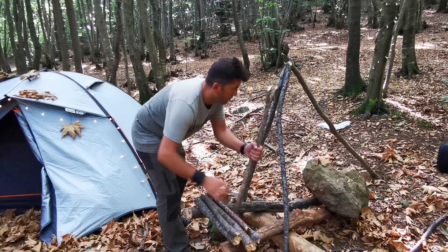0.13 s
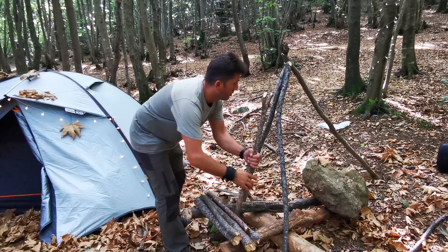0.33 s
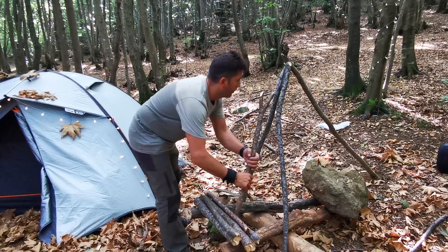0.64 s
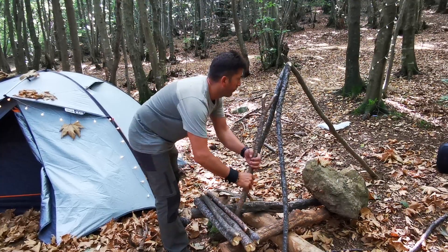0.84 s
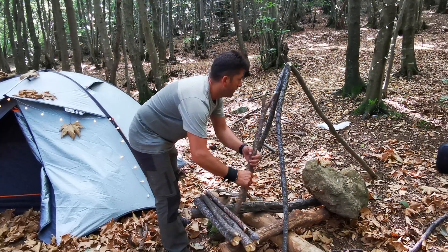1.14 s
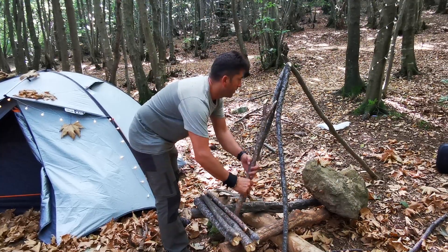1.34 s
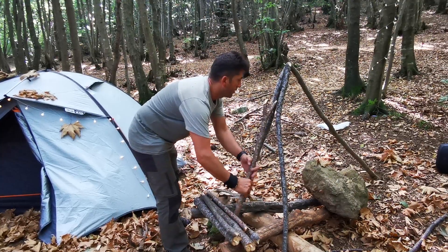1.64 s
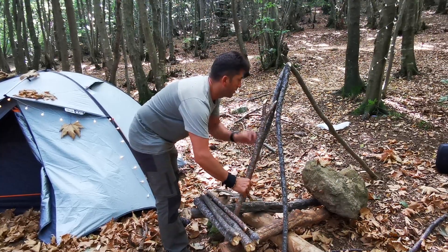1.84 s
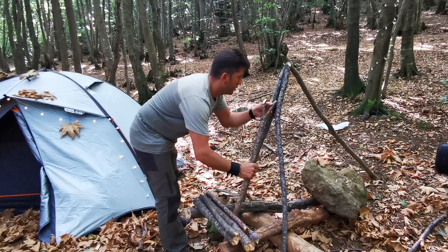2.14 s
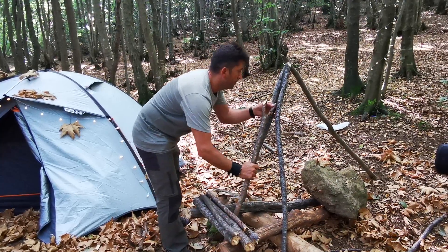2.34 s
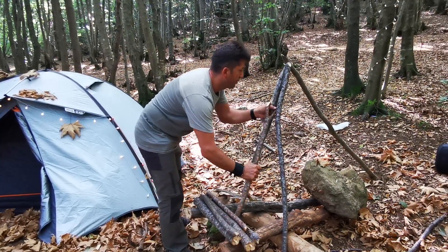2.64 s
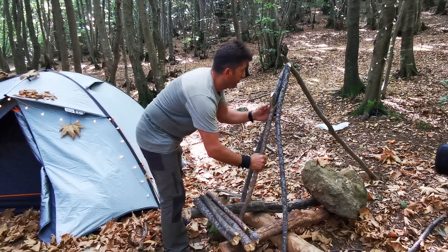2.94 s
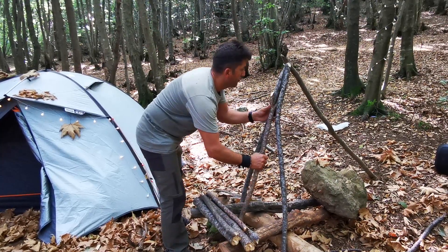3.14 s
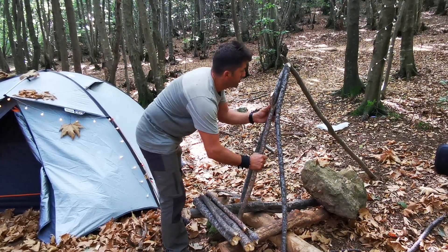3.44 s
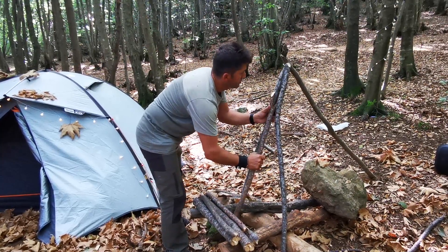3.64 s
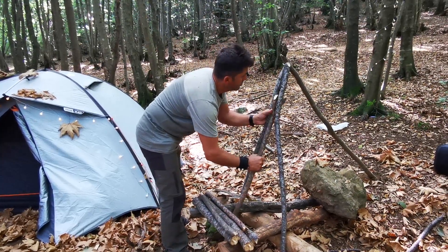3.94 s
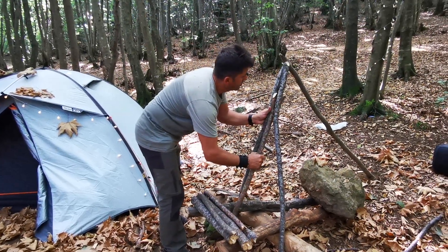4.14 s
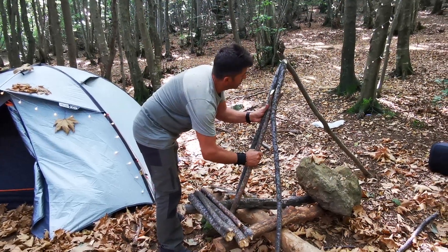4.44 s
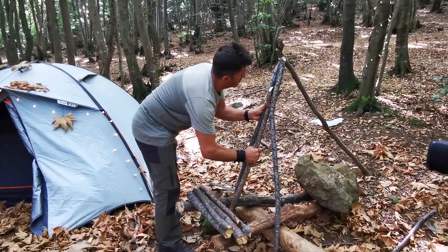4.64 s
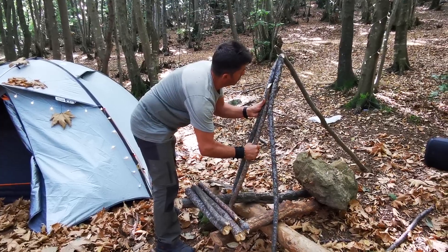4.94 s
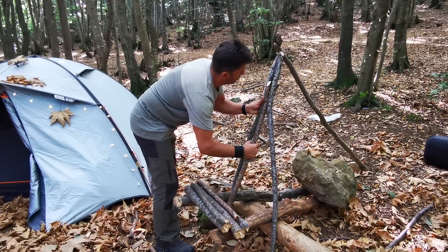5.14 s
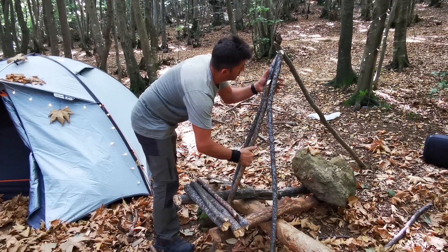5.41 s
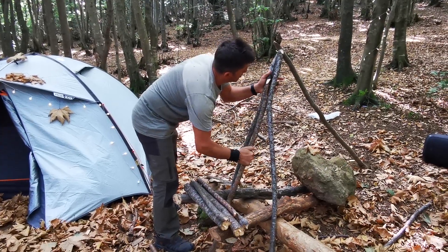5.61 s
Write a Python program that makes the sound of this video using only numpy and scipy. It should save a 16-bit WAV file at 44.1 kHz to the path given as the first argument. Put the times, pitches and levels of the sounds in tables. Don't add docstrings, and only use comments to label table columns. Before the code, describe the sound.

In a hushed woodland, sticks drop with hard woody knocks and crisp leaf snaps, followed by a scuff and sparse rubbing, crackling pole movements.

```python
import sys
import numpy as np
from scipy import signal
from scipy.fft import rfft, irfft
from scipy.io import wavfile

SR = 44100
rng = np.random.default_rng(int(sys.argv[2]) if len(sys.argv) > 2 else 0)


def dump_mix(stems):
    frames = np.atleast_2d(stems).T
    limited = np.clip(frames, -1, 1)
    pcm = np.round(limited * 32767).astype(np.int16)
    wavfile.write(sys.argv[1], SR, pcm)


def linear_from_db(decibels):
    return 10 ** (np.asarray(decibels, float) / 20)


N = 254456

# (frequency [Hz], density [dB per Hz])
AIR_SPECTRUM = [(12, -20.5), (20, -2), (113, -3), (172, -4), (251, -1), (380, -6.5), (690, -11),
                (1190, -21.5), (1500, -25), (1950, -88.5), (3300, -120)]
# (frequency [Hz], density [dB per Hz])
HISS_SPECTRUM = [(500, 3.5), (1200, -2), (2500, -2), (4000, -0.5), (7000, -2), (9000, -12.5),
                 (10500, -12.5), (15500, -15.5)]
AIR_DB, HISS_DB = -66.5, -64.5
# (time [s], level [dB], half-width [s])
GUSTS = [
    (.35, 6, 0.089),
    (1.3, 2.5, 0.5),
    (3.03, 5, 0.16),
    (3.2, 1.5, 0.075),
    (4.7, 2, 0.23),
    (5.65, 1.5, 0.12),
]
# (time [s], level [dB], half-width [s])
PUFFS = [
    (1.0, -2, .15),
    (3.37, 18, 0.084),
    (4.72, 7, 0.084),
]

# (time [s], peak
# level [dB], part below 8 kHz [dB])
LEAF_SNAPS = [(0.054, -43, 5), (0.0841, -23.5, -7), (0.0912, -15.5, -28), (.108, -25, -13.5),
              (0.1388, -11, -17), (0.161, -21.5, 2), (0.201, -20.5, -12), (0.23, -43, -15),
              (0.2371, -20.5, -24), (0.332, -46, -4), (0.463, -32, -3), (0.589, -33, 4), (0.673, -53, 5),
              (.733, -31.5, -19), (.7498, -40, -12), (.779, -38, -18), (.3621, -31, -12),
              (.3805, -31, -14), (.3935, -34, -12), (0.405, -32, -1), (.523, -32, -12), (0.545, -26, -12),
              (0.844, -45, -6), (0.88, -42, -10), (0.8895, -44, -10), (0.904, -38, -17), (0.927, -45, -15),
              (0.9406, -47, -8.5), (0.961, -44.5, -10),
              (1.4355, -39, -11), (1.5387, -38, 1), (2.4435, -36.5, -10), (2.4747, -44, -12),
              (2.4955, -25, -5.5), (2.4996, -22, -8), (2.651, -39, -19), (2.6746, -22, -30),
              (2.677, -32, -12), (2.6833, -20, -8), (2.6848, -15.5, -22), (2.6878, -24, -5),
              (2.6934, -15, -16), (2.7286, -30, -14), (3.031, -22, -18), (3.032, -21.5, -7.5),
              (3.7265, -25, -7), (3.731, -23, -12), (3.746, -27, -24), (3.7852, -33.5, 5), (3.8, -34, -12),
              (3.926, -29, -16), (3.9635, -23, -16), (3.974, -23.5, -23), (4.4965, -33, -19),
              (4.571, -45, -2), (4.8258, -36, -17), (4.9783, -34, -16), (4.985, -37, -18), (5.2121, -40, 0),
              (5.3815, -36, -11), (5.3894, -30, -24),
              (.021, -48, -3), (.0363, -48, -5), (0.102, -25, -11), (0.22, -30, 4), (0.5725, -31, -13),
               (0.626, -33, -4), (0.6357, -38, -12), (0.6884, -35, -10), (0.803, -41, -17.5),
               (.8522, -42, -7), (0.909, -48, -11), (.935, -49, -11), (1.285, -44, -10), (1.347, -48, -14),
               (1.4945, -45, -17), (1.5017, -46, -17), (1.679, -51, -13), (1.836, -46, -12),
               (1.9, -49, -12), (2.0596, -44, -12), (2.1679, -42, -12), (2.4341, -44, -4),
               (2.4596, -43, -8), (2.463, -41, -5), (2.4678, -45, -17), (2.6401, -50, -5),
               (2.7084, -44, -6), (2.9774, -33, -17), (3.154, -36, -19), (3.1669, -37, -13),
               (3.2041, -49, -4), (3.7488, -29, -17), (3.7544, -36, -12), (3.761, -36, -12),
               (3.775, -39, -4), (3.8259, -50, -7), (3.9166, -41, -5), (3.929, -31, -20),
               (3.9373, -35, -10), (3.947, -32, -11), (3.9508, -30, -10), (4.032, -39, 2),
               (4.067, -40.5, -12), (4.2375, -50, -7), (4.2441, -54, -6), (4.6936, -50, -7),
               (4.8141, -44, -15), (4.8171, -49, -11), (4.8287, -41, -5), (4.84, -44, -14),
               (4.8438, -39, -16), (4.932, -47, -4), (4.9875, -42, -16), (5.0677, -48, -13),
               (5.0853, -40, -3), (5.0893, -44, -8), (5.2238, -44, -12), (5.7035, -35, -10),
               (5.72, -42, -6), (5.723, -44, -14)]
SNAP_TOP_DB, SNAP_MIDDLE_DB, SNAP_RING_DB = -11, -2, -9.5
STRAY_PER_S, STRAY_SPREAD_DB = 25, 1

# (time [s], level [dB], frequency [Hz], ring [cycles])
TICKS = [(.053, -53.5, 2300, 20), (0.2187, -38.5, 2240, 13), (0.2485, -41, 1960, 20), (.281, -45, 2140, 33),
         (0.334, -26.5, 2070, 7.4), (0.382, -39, 2220, 57), (0.401, -35, 1500, 32), (.589, -61, 6800, 35),
         (0.6743, -34, 4940, 34), (.889, -38.5, 1700, 2.3), (1.479, -57, 2240, 59),
         (1.482, -49.5, 2190, 75), (1.527, -57, 2190, 74), (1.54, -53, 2260, 65), (1.816, -56.5, 2160, 37),
         (2.498, -44, 2860, 38), (2.686, -63, 2120, 18), (2.689, -56, 1300, 9.8), (2.76, -48, 1080, 8.2),
         (2.761, -50, 1600, 8), (2.762, -55, 2700, 12), (2.689, -56, 1700, 6.8), (2.691, -57, 900, 6),
         (3.732, -48, 2020, 79), (3.734, -43, 1090, 8.9), (3.928, -50, 2170, 21), (3.934, -56, 2250, 20),
         (3.938, -52, 2670, 36), (3.952, -51, 2640, 30), (3.962, -53, 2680, 30), (3.971, -54, 2700, 33),
         (4.122, -53.5, 2050, 30), (4.125, -52, 3550, 40), (4.116, -46.5, 5060, 40), (4.123, -46, 4630, 30),
         (4.571, -58, 2100, 25), (1.481, -46, 1090, 8), (1.095, -55, 2210, 29), (0.425, -45, 2400, 10),
         (0.553, -38, 2470, 21), (5.391, -46.5, 2580, 24)]

# (time [s],
# level [dB])
STICKS = [
    ([(584, -11, 0.04), (670, -5, 0.05), (932, 3, 0.014), (1274, -1, 0.014), (1491, 0.5, 0.039), (1861, -8.5, 0.03), (2150, -8, 0.015), (3050, -14.5, .02)], [(.0828, -27), (.0843, -22), (.0861, -24.5), (.0881, -23.5), (.0945, -27.5)]),
    ([(329, -25, 0.066), (805, -9.5, 0.04), (1272, -3, 0.09), (1781, -16.5, 0.04), (1965, -11, 0.06), (2186, -18.5, .045), (2745, -14.5, 0.04)], [(.1028, -16), (.1055, -23), (.1095, -25.5), (.114, -53), (.1295, -36)]),
    ([(932, 2.5, 0.033), (1000, 2.5, .04), (1130, -5.5, .04), (1350, 0, .03)], [(.0932, -34), (.0955, -21), (.1095, -27), (.129, -40), (.1315, -31), (.143, -32), (.151, -36), (.184, -39.5), (.2345, -45), (.249, -46)]),
    ([(322, -4.5, .07), (388, 1, .08), (488, -2.5, .06), (683, -4.5, .05)], [(.103, -38), (.109, -35), (.148, -36.5), (.168, -45), (.184, -58), (.191, -51), (.221, -54), (.244, -61), (.25, -53), (.282, -46)]),
    ([(388, -15.5, 0.14), (488, -17, 0.14), (813, -5.5, 0.15), (998, -5.5, 0.08), (1196, -14.5, 0.13), (1830, -22, 0.054)], [(.119, -23.5), (.131, -32), (.1405, -20), (.1445, -35), (.206, -40.5)]),
    ([(1010, 4.5, 0.045), (1572, 0.5, 0.06), (2455, -8.5, 0.045), (2934, -12, .03)], [(.1615, -30.5), (.1675, -34)]),
    ([(290, -7.5, 0.038), (560, -2, 0.038), (905, 4, 0.01)], [(.2715, -35.5), (.2755, -43), (.282, -46), (.2865, -43)]),
]
# (time [s], level [dB])
POLE = [
    ([(744, 1, 0.009), (906, 1, 0.012), (1060, -5, 0.013), (1286, -9, 0.025), (1850, -19, 0.018), (2160, -17.5, 0.028), (3670, -20, 0.013)], [(1.2915, -48), (1.2972, -28), (1.3003, -33.5), (1.3017, -40), (1.3048, -30.5), (1.3075, -33), (1.3095, -51), (1.314, -43)]),
    ([(122, -1.5, 0.033), (238, -7.5, 0.045), (396, 1, 0.018), (730, -17, 0.049)], [(1.300, -53), (1.304, -35), (1.312, -35.5), (1.3165, -34), (1.319, -43), (1.332, -39), (1.343, -44), (1.349, -38.5), (1.357, -45), (1.369, -49), (1.376, -49)]),
    ([(110, -1, .1), (203, 1.5, 0.065), (265, -4.5, 0.19), (326, -10.5, .07), (670, -7.5, 0.052)], [(2.69, -58), (2.705, -58.5), (2.855, -57), (3.015, -51), (3.05, -54), (3.07, -56), (3.095, -64), (3.19, -64), (4.71, -58)]),
]
LONGEST_T60_S = .15
WOODS_T60_S, WOODS_DB = .11, -22

# (time [s], fall [ms], level [dB], part below 8 kHz [dB]); fall spans a tenfold change
CRUSHES = [(0.087, 160, -30, -6.5), (0.137, 12, -31.5, -1), (0.157, 680, -38.5, -3), (0.891, 100, -55, -1),
           (1.092, 34, -49, -3), (1.298, 41, -45, -3), (1.435, 13, -50.5, 5), (1.681, 26, -54.5, -2),
           (2.326, 20, -50, -6), (2.651, 5, -48, -17), (2.685, 28, -29, -6.5), (2.852, 31, -43.5, -12),
           (3.03, 18, -34.5, -6), (3.729, 24, -27, -9.5), (3.928, 160, -38.5, -8), (3.99, 170, -51.5, -5.5),
           (4.119, 18, -42.5, -6), (4.495, 11, -47, 2), (4.57, 72, -51.5, -3), (4.813, 12, -57, -11.5),
           (4.838, 57, -43.5, -6), (4.935, 25, -48.5, -7), (5.083, 18, -51, -9), (5.386, 16, -41.5, -3),
           (5.489, 170, -39, -10.5), (5.687, 15, -42.5, -9), (5.701, 17, -46.5, -6), (5.719, 12, -45.5, -8)]
CRUSH_RISE_MS, CRUSH_HOLD_MS = 2.2, 3.9
# (greatest load [s], build-up [ms], level [dB], part below 8 kHz
# [dB])
RUBS = [(0.229, 30, -28, -10), (1.29, 27, -51, -9), (1.5, 103, -46, -7), (2.68, 12, -37, -11),
        (3.723, 13, -43, -3.5), (2.125, 40.3, -50.5, -4.5), (2.49, 42, -38.5, -5), (2.548, 22, -50, -26),
        (2.765, 32, -52, -4), (2.828, 22, -73, -13), (2.977, 113, -36.5, -11), (3.103, 89, -39.5, -10),
        (3.42, 74, -65, -6), (3.788, 71, -44.5, -5), (4.063, 42, -51, -8), (4.252, 33, -53, -14),
        (4.34, 25, -53, -1.5), (4.704, 39, -51, -3), (4.981, 39, -53, -1), (5.068, 8, -53, -6),
        (5.222, 17, -55, -8), (5.58, 32, -65, -12), (5.645, 49, -74, -8)]
RUB_HOLD_SHARE, RUB_FALL_SHARE = 0.29, 0.76
CRUSH_DULL_DB, CRUSH_DEEP_DB = -11.5, -15.5
# (time [s], load [dB], weight on the heel [dB], which deepens the crunch)
SCUFF = [
    (.25, -53, 0.48),
    (.34, -43.5, -0.6),
    (0.399, -35, 0.63),
    (.44, -44, 0.58),
    (.544, -37.5, -0.57),
    (.58, -43.5, -0.082),
    (.708, -51, 0.95),
    (.74, -48, 0.1),
    (.85, -72.5, 0),
]
SCUFF_MIDDLE_DB, SCUFF_DULL_DB = -5.5, -0.9
# (start [s], length [ms], level [dB], part
# below 8 kHz [dB])
SLIDES = [(1.515, 33, -44, -10), (1.808, 90, -60.5, -5), (2.0132, 2, -34.5, -11), (2.016, 5, -41, -4),
          (2.024, 11, -40.5, -3.5), (2.14, 45, -46.5, -7.5), (2.165, 28, -51.5, 0), (2.2, 70, -43.5, -10.5),
          (2.705, 38, -41, -8), (3.15, 20, -39, -13), (3.18, 28, -50, -3), (3.743, 18, -38.5, -4.5),
          (3.954, 20, -32.5, -4.5), (3.9734, 2.2, -30.5, 1.5), (.36, 8, -32, -14), (.38, 36, -30.5, -3.5),
          (.46, 8, -44, -10), (.51, 18, -35, -9), (.62, 20, -39.5, -7), (.725, 29, -50, -2),
          (4.145, 62, -51, -3.5), (5.405, 53, -51, -8), (5.485, 49, -41.5, -10)]
SLIDE_RISE_SHARE, SLIDE_STOP_MS = 0.6, 14
SLIDE_DULL_DB, SLIDE_DEEP_DB = -19, -36
# (low edge [Hz], high edge [Hz], level [dB])
CRUNCH_BANDS = [(3700, 5200, -13), (300, 750, -22), (750, 1600, -13), (1900, 3300, -9),
                (3900, 5700, -12.5), (5700, 6500, -10), (6500, 7700, -6.5), (8000, 10400, -13),
                (10400, 11800, -15), (11800, 13500, -14.5), (13500, 17500, -9)]

# (frequency [Hz], width [Hz], level [dB])
LEFT_PORT = [(44.9, 240, 3.5), (4230, 1500, 2), (8000, 560, 12.5), (13250, 2000, 5), (15700, 830, -16.5)]
# (frequency [Hz], width [Hz], level [dB])
RIGHT_PORT = [(2382, 1430, 10.5), (6796, 380, 8.5), (7580, 1300, -7.5), (9010, 280, 8.5), (10900, 1500, 5),
              (12760, 6130, 11), (14200, 1100, -9), (15040, 1560, 7)]
RIGHT_DB = 1.5


def rms_one(x):
    return x / np.sqrt(np.mean(x ** 2) + 1e-20)


def band(x, low_hz, high_hz):
    sos = signal.butter(2, [low_hz, min(high_hz, .45 * SR)], "band", fs=SR, output="sos")
    return signal.sosfilt(sos, x) * np.sqrt(SR / 2 / (high_hz - low_hz))


def low_pass(x, hz):
    return signal.sosfilt(signal.ellip(10, .5, 60, hz, fs=SR, output="sos"), x)


def peaks(x, table):
    for hz, width, db in table:
        w, g = 2 * np.pi * hz / SR, linear_from_db(db / 2)
        q = np.tan(np.pi * width / SR)
        above = [1 + q * g, -2 * np.cos(w), 1 - q * g]
        below = [1 + q / g, -2 * np.cos(w), 1 - q / g]
        x = signal.lfilter(above, below, x)
    return x


def drift(rate_hz):
    every = 40
    r = np.exp(-2 * np.pi * every * rate_hz / SR)
    settle = 2000
    noise = rng.standard_normal(N // every + settle + 2)
    slow = rms_one(signal.lfilter([1], [1, -2 * r, r * r], noise)[settle:])
    return np.interp(np.arange(N) / every, np.arange(len(slow)), slow)


def swells(rows):
    t = np.arange(N) / SR
    return sum(db * np.exp(-((t - s) / width) ** 2) for s, db, width in rows)


def coloured(points):
    hz = np.fft.rfftfreq(N, 1 / SR) + 1
    at, db = np.transpose(points)
    gain = linear_from_db(np.interp(np.log(hz), np.log(at), db, left=-90, right=db[-1]))
    return rms_one(irfft(rfft(rng.standard_normal(N)) * gain, N))


def pair(alike):
    signs = rng.choice([-1., 1.], (2, N))
    signs[1] = np.where(rng.random(N) < alike, np.roll(signs[0], -2), signs[1])
    return signs


def ring(s, gain, hz, t60):
    clicks = np.full(N, 1e-18)
    clicks[(np.asarray(s) * SR).astype(int)] = gain
    r, w = linear_from_db(-60 / (t60 * SR)), 2 * np.pi * hz / SR
    return signal.lfilter([0, np.sin(w)], [1, -2 * r * np.cos(w), r * r], clicks)


def forest():
    shared = coloured(AIR_SPECTRUM) * linear_from_db(1.1 * drift(6))
    own = coloured(AIR_SPECTRUM) * linear_from_db(-10 + 2.6 * drift(4))
    rumble = peaks(shared, [(113.2, 23, 8.6)]) + own * np.array([[1], [-1]])
    rumble = rumble * linear_from_db(AIR_DB + swells(GUSTS))
    gust = band(rng.standard_normal(N), 22, 58) * linear_from_db(swells(PUFFS) - 69.5 + 2.1 * drift(3.2))
    hiss = np.array([coloured(HISS_SPECTRUM), coloured(HISS_SPECTRUM)]) * linear_from_db(HISS_DB + .5 * drift(1.1))
    return rumble + gust * linear_from_db([[0], [-14]]) + hiss


def snaps(high, middle):
    s, db, middle_db = np.transpose(LEAF_SNAPS)
    stray = np.flatnonzero(rng.random(N) < STRAY_PER_S / SR)
    stray_db = 20 * np.log10(high[stray]) + STRAY_SPREAD_DB * rng.standard_normal(len(stray))
    s = np.append(s, stray / SR)
    db = np.append(db, stray_db)
    middle_db = np.append(middle_db, 20 * np.log10(middle / high)[stray])
    db = db - 10 * np.log10(1 + linear_from_db(2 * middle_db))
    out, noise = 0, pair(0.33)
    parts = [(db + SNAP_TOP_DB, 9200, 16500), (db + middle_db + SNAP_MIDDLE_DB, 4200, 8000)]
    for k, (part_db, low_hz, high_hz) in enumerate(parts):
        clicks = np.zeros(N)
        clicks[(s * SR).astype(int)] = linear_from_db(part_db)
        crack = signal.lfilter([1], [1, -np.exp(-1 / (.0006 * SR))], clicks)
        crumble = signal.lfilter([.14], [1, -np.exp(-1 / (.003 * SR))], clicks)
        out = out + (-1) ** k * band((0.67 * crack + crumble) * noise, low_hz, high_hz)
    note = ring(s, linear_from_db(db + SNAP_RING_DB), 10900, .0045)
    return out + band(np.array([np.roll(note, 2), note]), 9000, 15000) * linear_from_db([[-9], [-7]])


def ticks():
    notes = sum(ring(s, linear_from_db(db), hz, cycles / hz) for s, db, hz, cycles in TICKS)
    return signal.sosfilt(signal.butter(2, 600, "high", fs=SR, output="sos"), notes)


def knocks():
    out = np.zeros(N)
    for modes, blows in STICKS + POLE:
        s, db = np.transpose(blows)
        chance_db = rng.normal(0, 1.0, (len(blows), len(modes)))
        for k, (hz, mode_db, t60) in enumerate(modes):
            gain = linear_from_db(db + mode_db + chance_db[:, k]) * (-1) ** k
            out += ring(s, gain, hz, min(t60, LONGEST_T60_S))
    return signal.sosfilt(signal.butter(3, [170, 3600], "band", fs=SR, output="sos"), out)


def woods(x):
    s = np.arange(int(.5 * SR)) / SR
    envelope = linear_from_db(-60 * s / WOODS_T60_S) * np.minimum(s / 0.0025, 1)
    shared, own = rng.standard_normal((2, len(s))) * envelope
    tail = band(shared, 350.0, 3402) + band(own, 720, 2700) * [[.4], [-.4]]
    tail = tail / np.sqrt(np.sum(tail[0] ** 2))
    return signal.fftconvolve(x[None], tail, axes=1)[:, :N]


def pressure():
    t = np.arange(N) / SR
    at, load_db, heel_db = np.transpose(SCUFF)
    drag_db = np.interp(t, at, load_db, left=-99, right=-99)
    heel_db = np.interp(t, at, heel_db)
    part_db = np.array([[0], [SCUFF_MIDDLE_DB], [SCUFF_DULL_DB], [SCUFF_DULL_DB]])
    power = linear_from_db(drag_db + part_db + heel_db * [[0], [.5], [1], [1]]) ** 2

    # start [s], rise, hold, fall [ms], level, middle, dull, deep [dB]
    loads = []
    for s, fall, db, mid in CRUSHES:
        loads.append((s, CRUSH_RISE_MS, CRUSH_HOLD_MS, fall, db, mid, CRUSH_DULL_DB, CRUSH_DEEP_DB))
    for s, rise, db, mid in RUBS:
        hold, fall = RUB_HOLD_SHARE * rise, RUB_FALL_SHARE * rise
        loads.append((s, rise, hold, fall, db, mid, CRUSH_DULL_DB, CRUSH_DEEP_DB))
    for s, ms, db, mid in SLIDES:
        rise = SLIDE_RISE_SHARE * ms
        loads.append((s, rise, ms, SLIDE_STOP_MS, db, mid, SLIDE_DULL_DB, SLIDE_DEEP_DB))

    for start, rise, hold, fall, db, middle_db, dull_db, deep_db in loads:
        near = slice(max(int((start - .3) * SR), 0), int((start + .5) * SR))
        ms = 1000 * (t[near] - start)
        away = np.maximum(np.maximum(-ms / rise, (ms - hold) / fall), 0)
        below_db = db + middle_db
        peak_db = [[2 * db - 18.5], [2 * below_db - 15.5], [2 * (below_db + dull_db)],
                   [2 * (below_db + deep_db)]]
        power[:, near] += linear_from_db(peak_db) * linear_from_db(-40 * away)
    return np.sqrt(power)


def grains(per_s, spread_db, alike):
    sizes = linear_from_db(spread_db * np.minimum(rng.exponential(1, N), 4))
    sizes = sizes * (rng.random(N) < per_s / SR)
    clumps = linear_from_db(1.2 * drift(60) + 1.1 * drift(200))
    return rms_one(signal.lfilter([1], [1, -.8], sizes) * clumps * pair(alike))


def crunch(high, middle, low, deep):
    fine = grains(per_s=16000, spread_db=1.6, alike=.45)
    finest = grains(per_s=16000, spread_db=1.6, alike=.45)
    coarse = grains(per_s=5000, spread_db=2.3, alike=.65)
    sources = [fine * deep, coarse * deep, coarse * deep, coarse * low, band(fine * middle, 3700, 8200),
               fine * middle, fine * middle, finest * high, finest * high, finest * high, fine * high]
    out = 0
    for k, (x, (low_hz, high_hz, db)) in enumerate(zip(sources, CRUNCH_BANDS)):
        flicker = linear_from_db(db + 1.92 * drift(15.4) + 0.85 * drift(48.4))
        out = out + (-1) ** k * flicker * band(x, low_hz, high_hz)
    return out


def scene():
    wood = knocks()
    high, middle, low, deep = pressure()
    leaves = low_pass(snaps(high, middle), 16100)
    leaves = leaves + low_pass(crunch(high, middle, low, deep) + forest(), 15800)
    direct = wood * linear_from_db([[-1.5], [0]]) + ticks() * linear_from_db([[-1.2], [0]])
    return direct + linear_from_db(WOODS_DB) * woods(wood) + leaves


def top_cut(x):
    return signal.sosfilt(signal.butter(12, 16970, fs=SR, output="sos"), x)


def record(dry):
    left = peaks(dry[0], LEFT_PORT)
    right = linear_from_db(RIGHT_DB) * peaks(dry[1], RIGHT_PORT)
    return top_cut(np.array([left, right]))


dry = scene()
out = record(dry)
dump_mix(out)
```